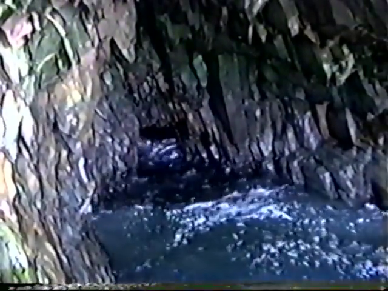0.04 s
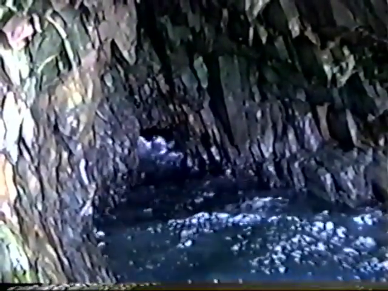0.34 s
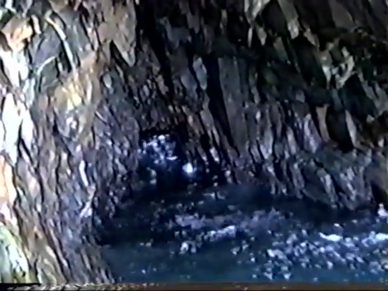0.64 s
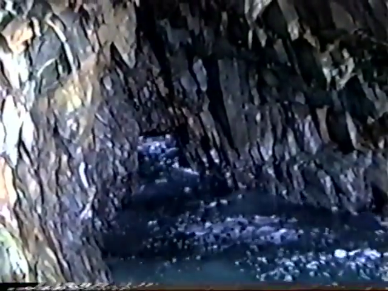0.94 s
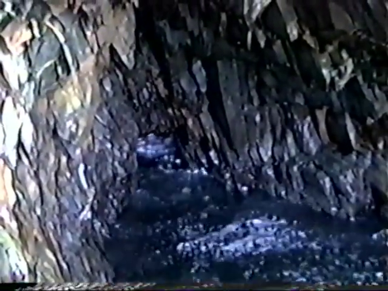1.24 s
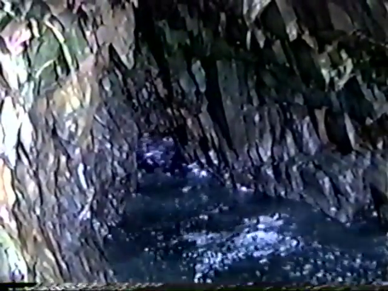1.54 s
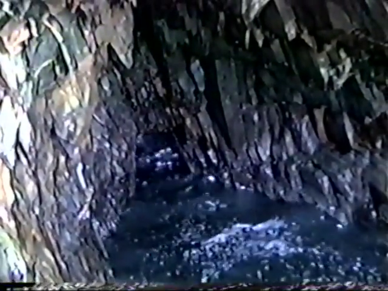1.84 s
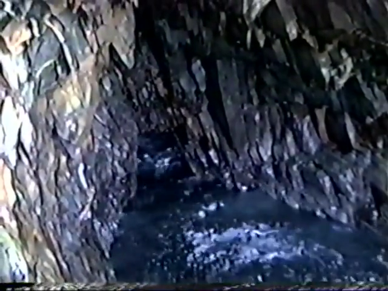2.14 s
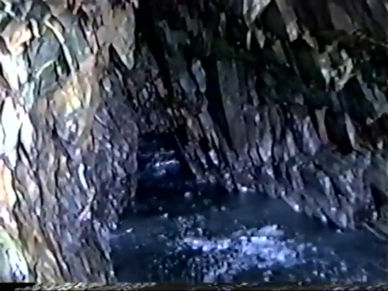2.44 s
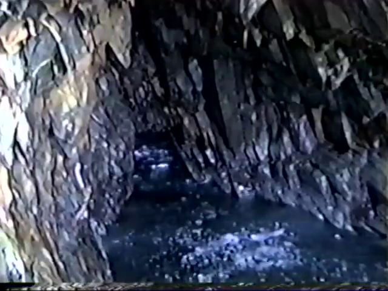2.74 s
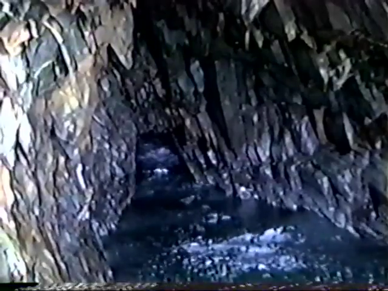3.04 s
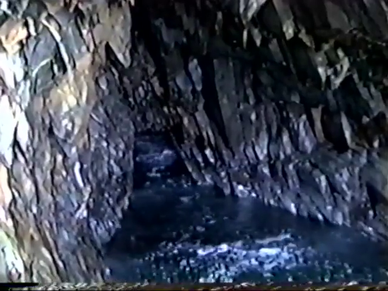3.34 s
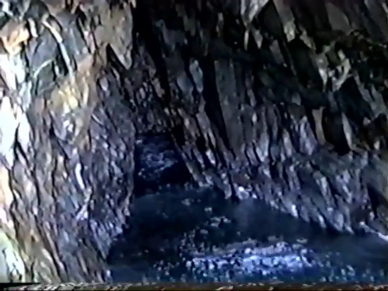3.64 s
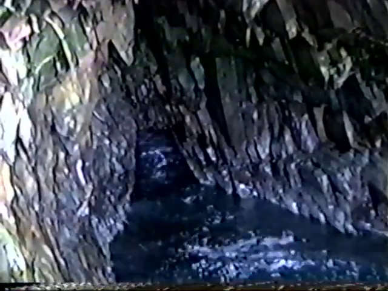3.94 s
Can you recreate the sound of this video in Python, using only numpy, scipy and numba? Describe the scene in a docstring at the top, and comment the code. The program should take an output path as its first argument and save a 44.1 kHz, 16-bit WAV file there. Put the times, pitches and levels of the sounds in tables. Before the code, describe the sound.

Sea water surges through a narrow rock cave in a continuous bubbling roar. Foam fizzes on top, gurgles and a low rumble roll below, and small waves occasionally slap the rock. The microphone sounds dull, with a short echo.

```python
"""A roar of sea water surging through a narrow rock cave: countless bubbles over churning water.
Foam fizzes on top, large bubbles gurgle below, and the swell booms in hollows of the walls.
Trapped air pockets gulp; now and then a small wave slaps the rock.
The cave rings behind the water; one dull microphone hears it."""
import sys
import numpy as np
from scipy import signal
from scipy.fft import rfft, irfft
from scipy.io import wavfile
from scipy.ndimage import uniform_filter1d
from numba import njit

SR = 44100
rng = np.random.default_rng(int(sys.argv[2]) if len(sys.argv) > 2 else 0)


def bounce(signal):
    """Save signal as a 16-bit WAV file at the path given by the first command-line argument."""
    frames = np.transpose(np.atleast_2d(signal))
    limited = np.clip(frames, -1, 1)
    pcm = np.round(limited * 32767).astype(np.int16)
    wavfile.write(sys.argv[1], SR, pcm)


N = 176400

# surge of the water, shared by wash and gurgle: time_s, relative_db
SURGE = [(0.03, -27), (0.35, -26.5), (0.96, -27), (0.97, -29), (1.06, -25.5), (1.07, -28), (1.31, -26.5),
         (1.32, -28.5), (1.69, -25.5), (1.84, -28.5), (1.85, -25.5), (1.92, -28), (2.07, -26), (2.09, -30),
         (2.19, -31), (2.22, -27), (2.51, -26.5), (2.52, -28.5), (2.63, -26.5), (2.99, -29), (3.2, -27.5),
         (3.29, -33), (3.34, -27.5), (3.43, -31), (3.54, -27.5), (3.57, -32.5), (3.66, -29), (3.67, -25),
         (3.76, -29), (3.88, -25.5), (3.91, -30), (3.97, -26.5)]


def undb(db):
    """Decibels to gain."""
    return 10 ** (np.asarray(db) / 20)


def unit(x):
    """Scale to rms 1."""
    return x / np.sqrt(np.mean(x ** 2) + 1e-18)


def follow(curve):
    """Gain along a curve of time_s, level_db."""
    time_s, level_db = np.array(curve).T
    return undb(np.interp(np.arange(N) / SR, time_s, level_db))


def colour(x, points):
    """Filter by points of freq_hz, gain_db; rms 1."""
    freq_hz, gain_db = np.array(points).T
    bins_hz = np.maximum(np.arange(N // 2 + 1) * SR / N, 1)
    response = undb(np.interp(np.log(bins_hz), np.log(freq_hz), gain_db))
    return unit(irfft(rfft(x) * response, N))


def lowpass(x, cutoff_hz):
    """Second-order low-pass."""
    return signal.sosfilt(signal.butter(2, cutoff_hz, fs=SR, output="sos"), x)


def band(centre_hz, octaves):
    """Noise in a bell-shaped band; rms 1."""
    bins_hz = np.maximum(np.arange(N // 2 + 1) * SR / N, 1)
    bell = np.exp(-.5 * (np.log2(bins_hz / centre_hz) / octaves) ** 2)
    return unit(irfft(rfft(rng.standard_normal(N)) * bell, N))


def wander(rate_hz):
    """Smoothed random steps; rms 1."""
    hold = max(int(SR / rate_hz), 2)
    steps = rng.standard_normal(1024)[np.arange(N) // hold % 1024]
    return unit(uniform_filter1d(steps, hold))


def pulse(start_s, attack_s, length_s):
    """Envelope: smooth rise, Gaussian decay."""
    age_s = np.maximum(np.arange(N) / SR - start_s, 0)
    onset = np.sin(np.pi / 2 * np.minimum(age_s / attack_s, 1)) ** 2
    return onset * np.exp(-(age_s / length_s) ** 2)


@njit
def ring(start_samples, pitch_hz, amplitudes, cycles, rise):
    """Each bubble is a damped sine whose pitch climbs as it nears the surface."""
    out = np.zeros(N)
    for k in range(len(start_samples)):
        n = int(cycles[k] * SR / pitch_hz[k])
        phasor = amplitudes[k] + 0j
        turn_rad = 2 * np.pi * pitch_hz[k] / SR
        step = np.exp(-5. / n) * np.exp(1j * turn_rad)
        glide = np.exp(1j * turn_rad * rise / n)
        for i in range(n):
            out[(int(start_samples[k]) + i) % N] += phasor.imag
            phasor *= step
            step *= glide
    return out


def bubbles(count, low_hz, high_hz, cycles, scatter_db, rise):
    """Cloud of bubbles, random in time, size, strength and damping; rms 1."""
    when, smallness, strength, sustain = rng.random((count, 4)).T
    pitch_hz = (np.sqrt(low_hz) + smallness * (np.sqrt(high_hz) - np.sqrt(low_hz))) ** 2
    spread_db = scatter_db * np.minimum(-np.log(1 - strength), 4)
    amplitudes = undb(spread_db) * pitch_hz ** .75  # evens the spectrum
    return unit(ring(when * N, pitch_hz, amplitudes, cycles * (.5 + sustain), rise))


def cave(x, wet_db):
    """Dense echoes off rock; the treble dies first, and the heaving surface keeps changing the paths."""
    low_t60_s, treble_t60_s, gap_s, shift_hz = 0.7, 0.41, .012, 1.7
    t, echoes, spectrum = np.arange(N) / SR, 0, rfft(x)
    for phase in np.pi * np.arange(4) / 4:
        noise = rng.standard_normal(N)
        low = lowpass(noise, 2500)
        tail = low * undb(-60 * t / low_t60_s) + (noise - low) * undb(-60 * t / treble_t60_s)
        crossfade = np.cos(np.pi * shift_hz * t + phase) ** 4
        echoes = echoes + irfft(spectrum * rfft(tail * (t > gap_s)), N) * crossfade
    wet = undb(wet_db)
    return (x + wet * unit(echoes) * np.std(x)) / np.sqrt(1 + wet ** 2)


def wash():
    """Bubbles ring in churning water; patches of the churn swell on their own."""
    # spectrum of the roar: freq_hz, gain_db
    wash_eq = [(150, -17), (300, -9.5), (420, -2.5), (600, 0), (900, -1.5), (1400, -3), (2000, -7),
               (2800, -12), (4000, -21.5), (5500, -43.5), (9000, -58)]
    patchy_db, churn_db, trim_db = 1.5, -3, 1
    cloud = bubbles(count=12000, low_hz=279.6, high_hz=5002, cycles=13.4, scatter_db=3, rise=0.1)
    churn = sum(band(hz, octaves=0.29) * np.sqrt(hz) * undb(patchy_db * wander(rate_hz=15))
                for hz in np.geomspace(250, 5000, 10))
    roar = cave(cloud + undb(churn_db) * unit(churn), wet_db=-2.5)
    return colour(roar, wash_eq) * follow(SURGE) * undb(trim_db)


def foam():
    """Tiny bubbles burst in a hiss of spray."""
    # amount of foam: time_s, relative_db
    foam_levels = [(0.03, -47.5), (0.34, -44.5), (0.58, -47.5), (1.48, -46), (1.73, -43), (1.99, -48.5),
                   (2.04, -45), (2.09, -47), (2.41, -45), (3.05, -47.5), (3.1, -52), (3.2, -47),
                   (3.29, -52.5), (3.38, -47), (3.46, -51), (3.53, -47), (3.61, -50), (3.71, -43.5),
                   (3.77, -47), (3.84, -43.5), (3.91, -48), (3.97, -47)]
    # spectrum of the spray: freq_hz, gain_db
    foam_eq = [(1500, -5), (3000, 1), (4800, -1), (7000, -1.5), (8500, -6), (10000, -14), (12000, -25.5),
               (13500, -25)]
    hiss_db, trim_db = -3, 2
    fizz = bubbles(count=30000, low_hz=1980, high_hz=12900, cycles=5.8, scatter_db=-0.5, rise=.1)
    spray = cave(fizz + undb(hiss_db) * rng.standard_normal(N), wet_db=-8.5)
    return colour(spray, foam_eq) * follow(foam_levels) * undb(trim_db)


def gurgle():
    """Large bubbles roll along the walls in churning water and fall away with the wash."""
    # strength of the gurgling: time_s, relative_db
    gurgle_levels = [(0.05, -37), (0.33, -37), (0.37, -35.5), (1.09, -33), (1.44, -40), (2.07, -31.5),
                     (2.09, -28.5), (2.22, -40), (2.27, -32.5), (2.65, -35), (3.05, -28.5), (3.29, -36.5),
                     (3.38, -31), (3.41, -36), (3.69, -33), (3.95, -35)]
    # spectrum of the gurgling: freq_hz, gain_db
    gurgle_eq = [(70, -18), (130, -11), (180, -1), (270, 1.5), (390, -2), (520, -19), (1000, -25)]
    churn_db, surge_coupling = -3, .4
    cloud = bubbles(count=1600, low_hz=110.5, high_hz=651, cycles=12, scatter_db=1.5, rise=0.094)
    rolling = cave(cloud, wet_db=-6.5)
    churn = undb(churn_db) * unit(lowpass(rng.standard_normal(N), 1000))
    envelope = unit(follow(SURGE)) ** surge_coupling * follow(gurgle_levels)
    return colour(rolling + churn, gurgle_eq) * envelope


def boom():
    """The swell rumbles in hollows of the rock."""
    # strength of the rumble: time_s, relative_db
    boom_levels = [(0, -55), (.29, -50), (.55, -45), (1.1, -48), (1.2, -55), (1.68, -47), (1.73, -40),
                   (1.95, -48), (2.45, -44.5), (2.78, -51), (2.98, -37), (3.25, -39), (3.7, -44),
                   (3.95, -43)]
    # response of the hollows: freq_hz, gain_db
    boom_eq = [(20, -24), (45, -28), (60, -16), (75, -11), (100, -8), (130, -1.5), (170, -2.5), (300, -28),
               (600, -52)]
    trim_db = 0.5
    return colour(rng.standard_normal(N), boom_eq) * follow(boom_levels) * undb(trim_db)


def gulps():
    """Trapped air rings with an unsteady, slightly rising pitch."""
    # air pockets: start_s, pitch_hz, level_db, length_s
    pockets = [(0.396, 562, -35, .06), (.49, 590, -30, 0.065), (.67, 696.5, -28.5, 0.056),
               (1.03, 614, -32, 0.055), (1.25, 880, -31, .06), (1.541, 444, -29.5, 0.074),
               (1.706, 125, -33.5, 0.066), (1.844, 827, -30, 0.054), (1.88, 530, -32, 0.048),
               (2.025, 604.6, -29, 0.047), (2.083, 275, -31, 0.058), (2.086, 400, -31, 0.058),
               (2.342, 427, -29.5, 0.067), (2.828, 336, -33, 0.07), (2.993, 258.5, -29, .08),
               (3.197, 406.5, -30, 0.094), (3.493, 175.2, -32, .07)]
    rise_per_length, waver, attack_s = .04, .03, 0.017
    t, out = np.arange(N) / SR, np.zeros(N)
    for start_s, pitch_hz, level_db, length_s in pockets:
        climb = rise_per_length * np.clip((t - start_s) / length_s - .5, -1, 2)
        freq_hz = pitch_hz * (1 + climb + waver * wander(rate_hz=120))
        tone = np.sqrt(2) * np.sin(2 * np.pi * np.cumsum(freq_hz) / SR)
        out += undb(level_db) * pulse(start_s, attack_s, length_s) * tone
    return cave(out, wet_db=-9)


def slaps():
    """Small waves break on the rock in short splashes."""
    # wave impacts: start_s, centre_hz, level_db, length_s
    impacts = [(1.04, 1000, -28, 0.055), (1.609, 1950, -26, 0.053), (1.72, 1710, -34, .08),
               (2.028, 850, -30, 0.054), (3.66, 700, -28.5, 0.046)]
    attack_s = 0.013
    splashes = sum(undb(level_db) * band(centre_hz, octaves=0.34) * pulse(start_s, attack_s, length_s)
                   for start_s, centre_hz, level_db, length_s in impacts)
    return cave(splashes, wet_db=0)


def scene():
    """All the water in the cave, mono."""
    return (wash() + foam() + gurgle() + boom() + gulps() + slaps())[None]


def record(dry):
    """The recorder cuts the top and adds a silent DC offset."""
    cutoff_hz, dc_offset = 13400, .4953
    return dc_offset + signal.sosfilt(signal.ellip(10, .2, 80, cutoff_hz, fs=SR, output="sos"), dry)


dry = scene()
out = record(dry)
bounce(out)
```